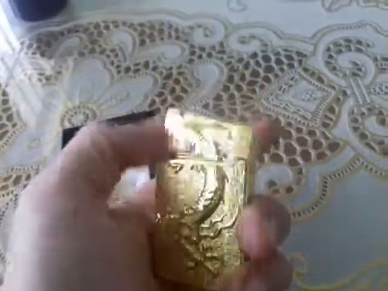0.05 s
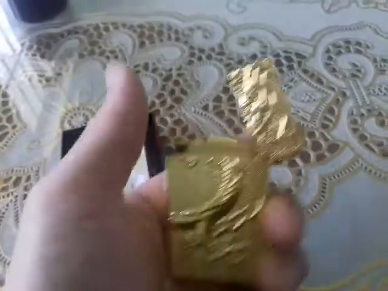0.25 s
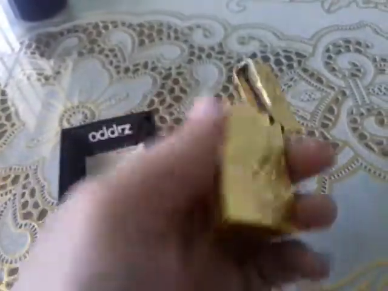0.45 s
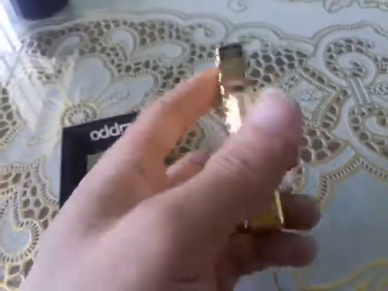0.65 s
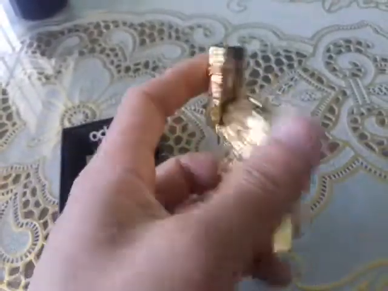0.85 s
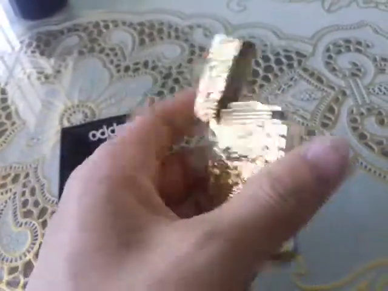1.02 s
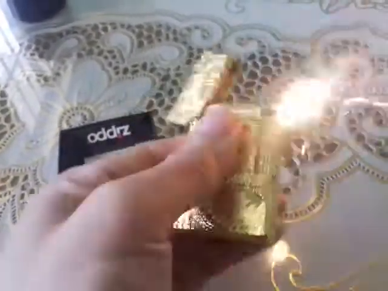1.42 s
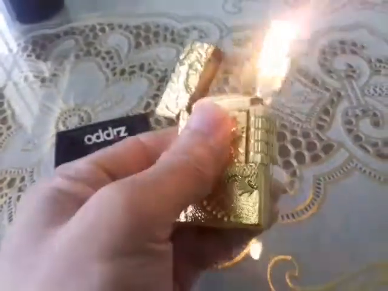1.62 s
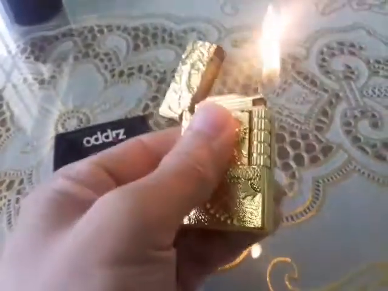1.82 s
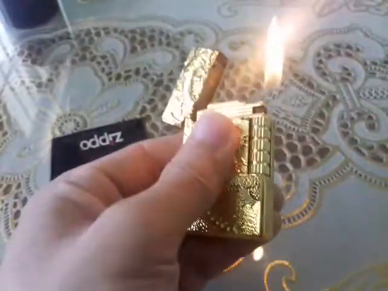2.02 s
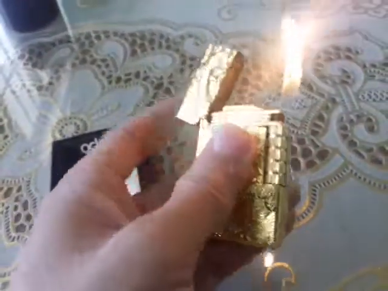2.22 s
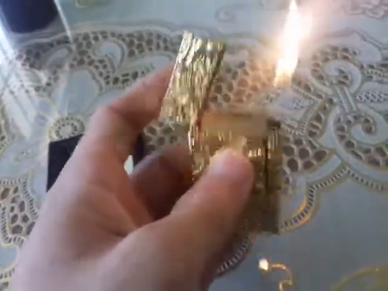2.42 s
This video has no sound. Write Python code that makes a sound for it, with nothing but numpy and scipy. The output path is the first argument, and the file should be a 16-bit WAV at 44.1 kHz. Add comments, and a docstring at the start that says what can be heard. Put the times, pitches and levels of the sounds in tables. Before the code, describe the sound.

A metal gas lighter flips open with a bright, ringing ping in a reverberant room. About a second later the flint scrapes once, and the gas catches and settles into a thin hiss, close to the microphone.

```python
"""In a live room, a metal gas lighter is opened and struck close to a small microphone.
Impacts excite the lid's normal modes: a bright ping that overloads the microphone and reverberates.
The roller scrapes the flint once, and friction drives the resonances of the case as sparks fizz.
The gas flares with a turbulent rush, then settles to a thin hissing flame.
The room's hum and hiss sink away after the ping and slowly return."""
import sys
import numpy as np
from scipy import signal
from scipy.fft import rfft, irfft, next_fast_len
from scipy.io import wavfile
from scipy.ndimage import map_coordinates

SR = 44100
rng = np.random.default_rng(int(sys.argv[2]) if len(sys.argv) > 2 else 0)


def file_out(sig):
    """Save sig as 16-bit WAV at sys.argv[1]."""
    # one column per channel
    cols = np.atleast_2d(sig).T
    # limit, then scale
    lim = np.clip(cols, -1, 1)
    pcm = np.round(lim * 32767).astype(np.int16)
    wavfile.write(sys.argv[1], SR, pcm)


N = 112454


def amp(db):
    """Amplitude ratio of a level in decibels."""
    return 10 ** (np.asarray(db) / 20)


def unit(x):
    """Normalisation to rms 1."""
    return x / np.sqrt(np.mean(x ** 2) + 1e-20)


def along(points, hz):
    """Interpolation of (frequency_hz, value) points on a logarithmic frequency axis."""
    freqs, values = np.transpose(points)
    return np.interp(np.log(hz + 1), np.log(freqs + 1), values)


def since(start_s):
    """Elapsed seconds after an onset, zero before it."""
    return np.maximum(np.arange(N) / SR - start_s, 0)


def curves(rows):
    """Linear interpolation, at every sample, of each column after the time."""
    times, *columns = np.transpose(rows)
    return [np.interp(since(0), times, column) for column in columns]


def gesture(rows):
    """Amplitude envelope through (time_s, level_db) points, silent outside them."""
    times, db = np.transpose(rows)
    return amp(np.interp(since(0), times, db, left=-np.inf, right=-np.inf))


def burst(start_s, attack_s, t60_s):
    """Exponential rise and decay, falling 60 dB in t60_s."""
    t = since(start_s)
    return (1 - np.exp(-t / attack_s)) * amp(-60 * t / t60_s)


def wobble(knots_per_s):
    """Random modulation: a smooth curve through Gaussian values."""
    knots = rng.standard_normal(int(N * knots_per_s / SR) + 4)
    return map_coordinates(knots, [since(0) * knots_per_s])


def filtered(x, response):
    """Linear filtering: the spectrum is multiplied by a complex frequency response."""
    size = next_fast_len(N + SR // 2)
    return irfft(rfft(x, size) * response(np.fft.rfftfreq(size, 1 / SR)), size)[:N]


def coloured(x, spectrum):
    """Spectral shaping by (frequency_hz, gain_db) points, at rms 1."""
    return unit(filtered(x, lambda hz: amp(along(spectrum, hz))))


def noise(spectrum):
    """Coloured Gaussian noise of rms 1."""
    return coloured(rng.standard_normal(N), spectrum)


def grit(grains_per_s=5700):
    """Shot noise: dense tiny impulses of random size."""
    return rng.standard_normal(N) * (rng.random(N) < grains_per_s / SR)


def click(start_s, level_db, pitch_hz, decay_cycles):
    """Heavy damping: a dead contact swells and dies within a few cycles."""
    t = since(start_s)
    age = t * pitch_hz / decay_cycles
    return amp(level_db) * age ** 2 * np.exp(1 - age) * np.sin(2 * np.pi * pitch_hz * t)


# Spectrum of the room's rumble: frequency_hz, gain_db
RUMBLE_SPECTRUM = [(20, -5.5), (50, 0), (90, -11), (200, -25.5), (1000, -68.5)]
def rumble(level_db=-95.5):
    """Stationary noise: a faint, steady low rumble."""
    return amp(level_db) * noise(RUMBLE_SPECTRUM)


# Tones of the hum: start_hz, relative_db
HUM_TONES = [(119, -3.5), (141, -4.5), (166, -3.5)]
# Noise band around the tones: frequency_hz, gain_db
HUM_SPECTRUM = [(30, -30.5), (95, -30), (120, -0.5), (165, 0), (205, 0.5), (245, -14.5), (320, -13),
                (500, -29), (2000, -100)]
def hum(rise_hz_per_s=8.8, waver_db=2, noise_db=-7.5):
    """Amplitude and frequency modulation: low tones waver and creep upward in a band of noise."""
    t = since(0)
    tones = 0
    for hz, db in HUM_TONES:
        gain = amp(db + waver_db * wobble(2.7))
        cycles = hz * t + rise_hz_per_s * t * t / 2 + rng.random()
        tones += gain * np.sin(2 * np.pi * cycles)
    return tones + amp(noise_db) * noise(HUM_SPECTRUM)


# Course of the room's background: time_s, hiss_db, hum_db
BACKGROUND_LEVELS = [(0, -44.5, -53), (.17, -45, -58), (.23, -50.5, -57.5), (.39, -60.5, -58.5),
                     (.5, -64, -67.5), (.75, -67.5, -72), (1.03, -72.5, -74.5), (1.39, -73, -75.5),
                     (1.52, -68, -70), (1.77, -58, -63.5), (2.1, -52, -59), (2.3, -51.5, -58.5),
                     (2.39, -49, -59.5), (2.55, -52, -62.5)]
# Spectrum of the room's hiss: frequency_hz, gain_db
HISS_SPECTRUM = [(30, -18.5), (55, -8.5), (90, -19), (280, -7), (400, -3.5), (700, -5), (1500, -2.5),
                 (2000, -4.5), (2600, 0), (3500, -1.5), (4600, -12), (6500, -24.5), (10000, -32),
                 (15500, -29)]
def background():
    """Ambient noise floor: hum and hiss sink and return over the rumble."""
    hiss_db, hum_db = curves(BACKGROUND_LEVELS)
    return amp(hum_db) * hum() + amp(hiss_db) * noise(HISS_SPECTRUM) + rumble()


# Reverberation time of the room: frequency_hz, t60_s
ROOM_T60 = [(200, 2.4), (2000, 0.66), (3500, 0.98), (4500, 0.6821), (6000, 0.4), (8000, 0.57),
            (10000, 0.55), (12500, 0.65)]
# Colour of the reverberation: frequency_hz, gain_db
ROOM_COLOUR = [(200, -9), (1200, -8), (1700, -5.5), (2100, 3), (2800, 0.5), (3800, -2), (4450, -4),
               (5000, -5), (6000, -2.5), (7500, 1), (10000, 2), (12200, -1), (14000, -13.5)]
def reverberation(x, delay_s=0.0027, build_s=0.0083):
    """Diffuse field: reflections build up briefly, then each frequency decays at its own rate."""
    hz, t, spectra = signal.stft(rng.standard_normal(N), SR, nperseg=256)
    decay = amp(-60 * t / along(ROOM_T60, hz)[:, None])
    tail = signal.istft(spectra * decay, SR, nperseg=256)[1][:N]
    tail *= 1 - np.exp(-since(delay_s) / build_s)
    tail = filtered(tail / np.linalg.norm(tail), lambda f: amp(along(ROOM_COLOUR, f)))
    return signal.fftconvolve(x, tail)[:N]


# Single echoes from nearby walls: delay_s, gain_db
WALL_ECHOES = [(.041, -24), (.056, -24), (0.095, -26)]
def echoes(x):
    """Specular reflection: each wall returns one delayed, weaker copy."""
    return filtered(x, lambda hz: sum(amp(db) * np.exp(-2j * np.pi * hz * delay_s)
                                      for delay_s, db in WALL_ECHOES))


# Ticks of the handled case: start_s, level_db, pitch_hz
CASE_TICKS = [(0.6079, -36, 2700), (1.5720, -33, 4400)]
def ticks():
    """Damped transients: the case ticks as the fingers shift on it."""
    return sum(click(s, db, hz, decay_cycles=0.33) for s, db, hz in CASE_TICKS)


# Hiss of the settling flame: time_s, level_db, centre_hz, width_hz
JET_BAND = [(1.84, -70, 4710, 1200), (1.89, -57.5, 4200, 1300), (1.922, -47, 3580, 850),
            (1.955, -41.5, 3580, 896), (1.99, -42.5, 3350, 1060), (2.05, -45, 3300, 1260),
            (2.16, -49.5, 3330, 1180), (2.3, -57.5, 3365, 1228), (2.55, -69, 3200, 1197)]
def jet(flutter_db=1.74):
    """Jet noise: as the flame narrows, a band of hiss swells, slides down and fades."""
    level_db, centre_hz, width_hz = curves(JET_BAND)
    hz, t, spectra = signal.stft(rng.standard_normal(N), SR, nperseg=512)
    centre_hz, width_hz = np.interp(t, since(0), centre_hz), np.interp(t, since(0), width_hz)
    detuning = 2 * np.abs(hz[:, None] - centre_hz) / width_hz
    band = 1 / (1 + detuning ** 3) / np.sqrt(width_hz)  # equal power at any width
    hiss = unit(signal.istft(spectra * band, SR, nperseg=512)[1][:N])
    started = since(JET_BAND[0][0]) > 0
    return hiss * amp(level_db + flutter_db * wobble(90)) * started


# Whistle of the nozzle: time_s, level_db
WHISTLE_LEVELS = [(1.48, -70), (1.51, -52), (1.6, -56.5), (1.79, -57.5), (1.88, -76)]
def whistle(pitch_hz=2716, width_hz=150):
    """Narrow-band noise: the nozzle gives an airy tone while the gas flares."""
    tone = filtered(rng.standard_normal(N), lambda hz: 1 / (1 + (2 * (hz - pitch_hz) / width_hz) ** 2))
    return gesture(WHISTLE_LEVELS) * unit(tone)


# Spectrum of the first flare of gas: frequency_hz, gain_db
FLARE_SPECTRUM = [(40, -60), (200, -20), (1200, -22), (2050, -8), (2420, 1), (2700, -7), (2950, -8.5),
                  (3700, -9), (4100, -20), (4700, -13.5), (6500, -33), (8000, -28), (8400, -28),
                  (8900, -35), (10000, -34.5), (15500, -47)]
def flare(level_db=-49.5, fade_db_per_s=27.5):
    """Combustion noise: the gas catches with a turbulent rush that fades."""
    envelope = burst(start_s=1.465, attack_s=0.012, t60_s=60 / fade_db_per_s)
    return amp(level_db) * envelope * noise(FLARE_SPECTRUM)


# Shower of sparks: start_s, level_db, t60_s
SPARK_BURSTS = [(1.4378, -47, .008), (1.4560, -45, 0.064), (1.4614, -30.5, 0.026), (1.4733, -39.5, .025),
                (1.4790, -41, .01)]
# Spectrum of their fizz: frequency_hz, gain_db
FIZZ_SPECTRUM = [(40, -55), (150, -20), (700, -2.5), (4000, -0.5), (6500, 2), (8300, 3.5), (10000, -16.5),
                 (12500, -19), (15500, -31)]
def sparks(attack_s=0.00094):
    """Shot noise: hot flint chips fizz off the roller at the height of the stroke."""
    envelope = sum(amp(db) * burst(s, attack_s, t60) for s, db, t60 in SPARK_BURSTS)
    return envelope * coloured(grit(), FIZZ_SPECTRUM)


# Resonances of the roller and case: centre_hz, width_hz, gain_db
CASE_MODES = [(2448, 83, 4), (2900, 270, -12), (3530, 310, -17.5), (4940, 690, -19)]
def case_response(hz, low_cut_hz=700):
    """Modal superposition: resonances of alternating polarity add, and the bass rolls off."""
    modes = sum((-1) ** k * amp(db) * 1j * hz * width / (centre ** 2 - hz ** 2 + 1j * hz * width)
                for k, (centre, width, db) in enumerate(CASE_MODES))
    return hz / (hz + low_cut_hz) * modes


# Flint catching on the roller: start_s, level_db, t60_s
FLINT_CATCHES = [(1.4040, -55, 0.037), (1.4154, -45, .03), (1.4234, -36, 0.024), (1.4260, -52, 0.021),
                 (1.4367, -32.5, 0.026), (1.4487, -29, 0.033), (1.4551, -24, 0.014), (1.4597, -11.5, 0.016),
                 (1.4638, -27, 0.027), (1.4746, -28, 0.018), (1.48, -29, .009), (1.4847, -18, 0.0045)]
# Strength of the scrape: time_s, level_db
SCRAPE_LEVELS = [(1.39, -89), (1.434, -67), (1.446, -39), (1.457, -41), (1.463, -27), (1.47, -32.5),
                 (1.479, -44), (1.49, -69), (1.52, -82)]
# Spectrum of the flint's rasp: frequency_hz, gain_db
RASP_SPECTRUM = [(40, -60), (150, -27), (300, -23), (800, -20.5), (1600, -49), (2400, -2), (3500, 12),
                 (4600, 1), (5500, -2.5), (6500, -23), (8300, -26), (10500, -36), (15500, -56)]
def flint(attack_s=0.00085, catch_rasp_db=-11.5):
    """Stick-slip friction: the roller rasps over the flint, and each catch shakes the case."""
    catches = sum(amp(db) * burst(s, attack_s, t60) for s, db, t60 in FLINT_CATCHES)
    ring = catches * unit(filtered(grit(), case_response))
    rasp_envelope = gesture(SCRAPE_LEVELS) + amp(catch_rasp_db) * catches
    return ring + rasp_envelope * coloured(grit(), RASP_SPECTRUM)


LID_ATTACK_S = 0.00039
# Lid contacts (catch release, snap open, rebound): start_s, level_db, t60_s
LID_CONTACTS = [(0.2284, -13, 0.051), (0.23, -4, 0.017), (0.234, -17, 0.0062)]
# Spectrum of each crack: frequency_hz, gain_db
CRACK_SPECTRUM = [(25, -42), (60, -32), (300, -39.5), (560, -24), (750, -23), (1100, -23), (1600, -11),
                  (2100, -10.5), (3300, 6.5), (4600, -7.5), (5200, -12), (6200, -18), (9500, -23),
                  (11000, -33), (12000, -24.5), (13000, -32.5), (15500, -42)]
def lid_cracks():
    """Impact noise: each brief metal contact gives a broadband crack; the hinge adds a dull knock."""
    envelope = sum(amp(db) * burst(s, LID_ATTACK_S, t60) for s, db, t60 in LID_CONTACTS)
    knock = click(start_s=0.2308, level_db=-33, pitch_hz=640, decay_cycles=0.45)
    return envelope * noise(CRACK_SPECTRUM) + knock


# Pulses of tone from the swinging lid: start_s, level_db, length_s
LID_SWINGS = [(0.2302, 1, 0.0039), (0.2355, 0, 0.0049)]
def lid_swing(pitch_hz=4403, edge_s=0.000293):
    """Constrained vibration: bound by its spring, the lid sings at one pitch as it swings."""
    def step(at_s):
        return 0.5 + 0.5 * np.tanh((since(0) - at_s) / edge_s)
    envelope = sum(amp(db) * step(s) * (1 - step(s + length)) for s, db, length in LID_SWINGS)
    onset_s = LID_SWINGS[0][0] - 2 * edge_s
    return envelope * np.sin(2 * np.pi * pitch_hz * since(onset_s))


# Normal modes of the open lid: pitch_hz, level_db, t60_s
LID_MODES = [(2109, -20, 0.027), (2527, -20, 0.046), (3160, -18.5, 0.045), (3550, -14.5, 0.015),
             (3747, -18, 0.018), (3980, -17, 0.033), (4450, -3.5, .09), (4738, -5, 0.14),
             (7400, -41, 0.036), (7920, -34, 0.048), (12150, -33, .03)]
def lid_ring(open_s=0.2335):
    """Free vibration: the lid's modes decay exponentially, and close ones beat."""
    t = since(open_s)
    return sum(amp(db) * burst(open_s, LID_ATTACK_S, t60) * np.sin(2 * np.pi * hz * t)
               for hz, db, t60 in LID_MODES)


def scene(ping_room_db=-9, crack_room_db=-15.5, strike_room_db=-16.5):
    """Superposition: lid, flint and flame add to the room's reflections and background."""
    ping = lid_swing() + lid_ring()
    crack = lid_cracks()
    strike = flint() + sparks() + ticks()
    lid_reverb = reverberation(amp(ping_room_db) * ping + amp(crack_room_db) * crack)
    strike_reverb = amp(strike_room_db) * reverberation(strike)
    reflections = echoes(ping) + lid_reverb + strike_reverb
    flame = flare() + whistle() + jet()
    return (background() + reflections + flame + strike + crack + ping)[None]


# Treble loss of the microphone: frequency_hz, gain_db
MIC_TREBLE = [(9000, 0), (12000, -2.5), (13300, -4.5), (16000, -4.5)]
def record(dry, ceiling=0.92, hardness=4.7, band_limit_hz=16000):
    """Saturation and band limiting: the microphone rounds off the peaks, then softens the treble."""
    x = signal.resample_poly(dry[0], 2, 1)  # oversampling reduces aliasing
    x = x / (1 + np.abs(x / ceiling) ** hardness) ** (1 / hardness)
    x = signal.resample_poly(x, 1, 2)
    x = filtered(x, lambda hz: amp(along(MIC_TREBLE, hz)))
    return filtered(x, lambda hz: 1 / (1 + (hz / band_limit_hz) ** 80))[None]


dry = scene()
out = record(dry)
file_out(out)
```